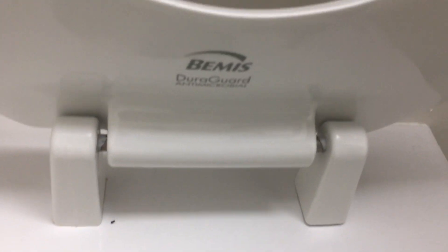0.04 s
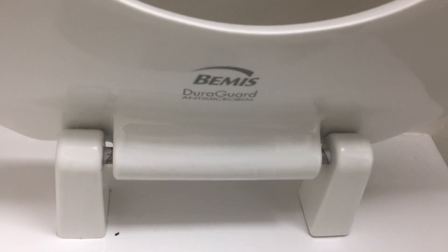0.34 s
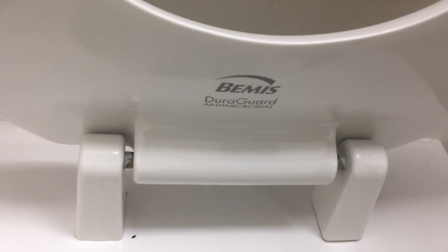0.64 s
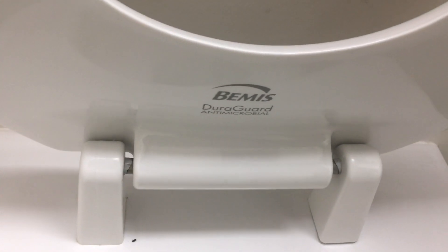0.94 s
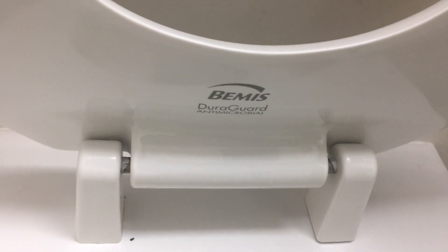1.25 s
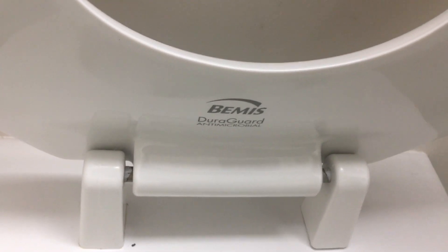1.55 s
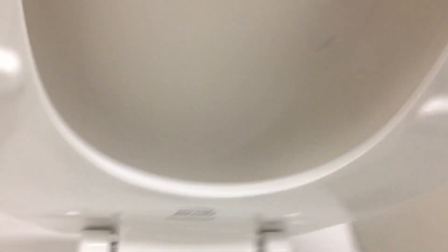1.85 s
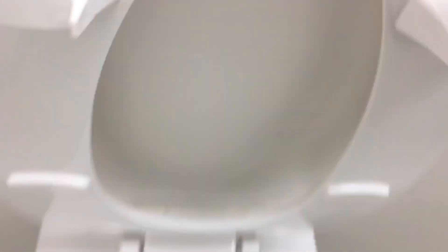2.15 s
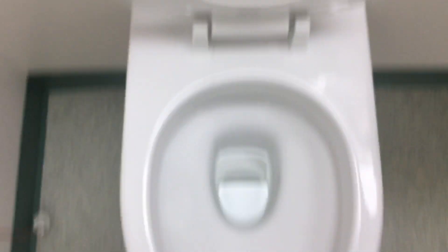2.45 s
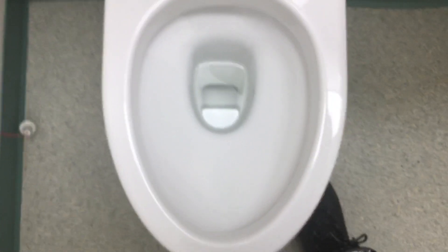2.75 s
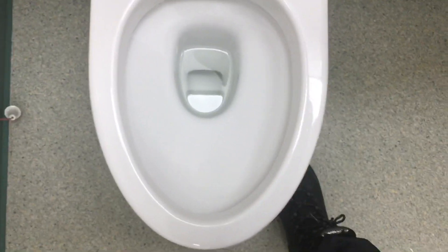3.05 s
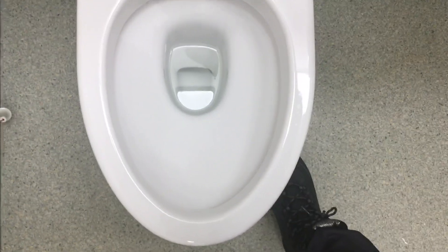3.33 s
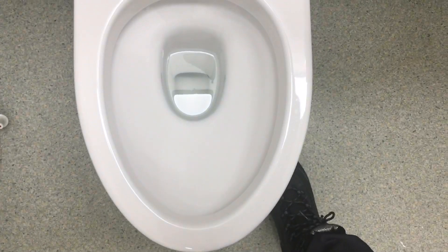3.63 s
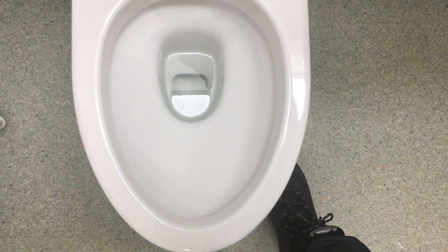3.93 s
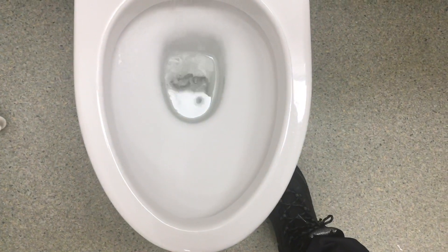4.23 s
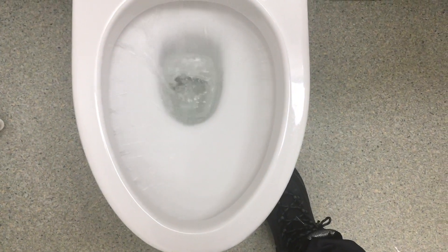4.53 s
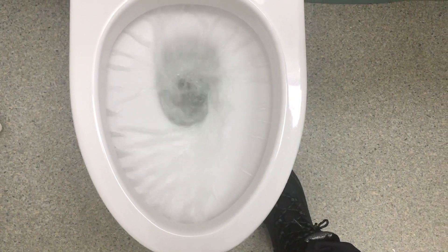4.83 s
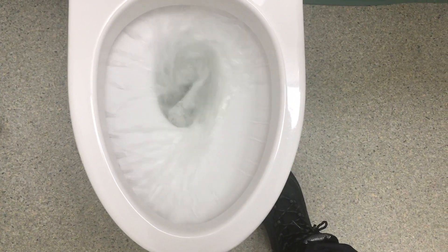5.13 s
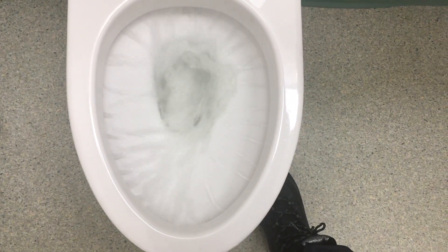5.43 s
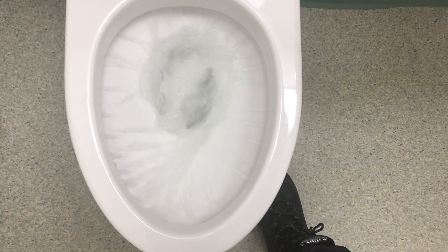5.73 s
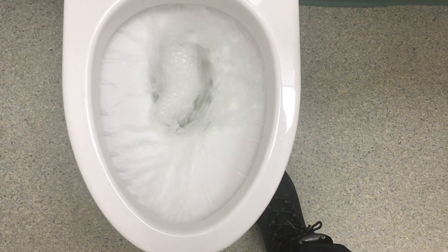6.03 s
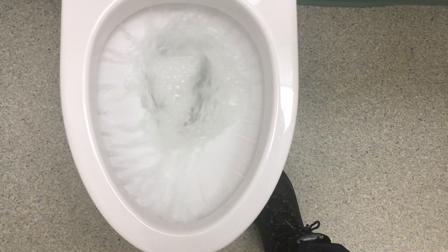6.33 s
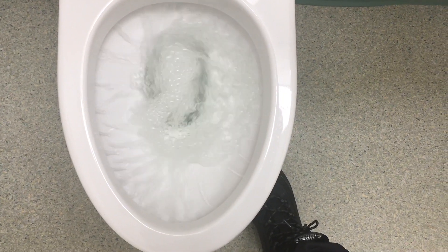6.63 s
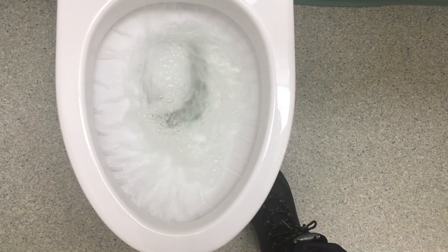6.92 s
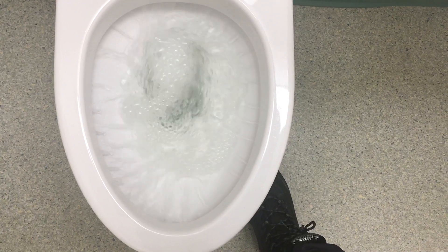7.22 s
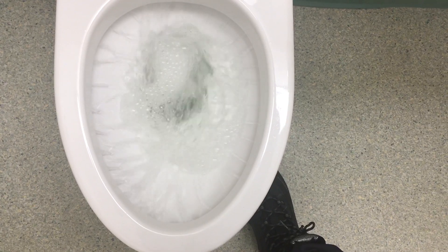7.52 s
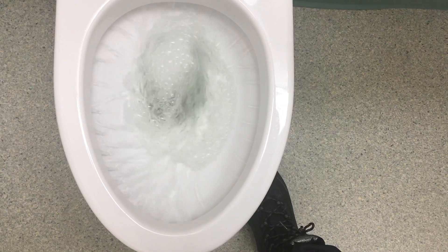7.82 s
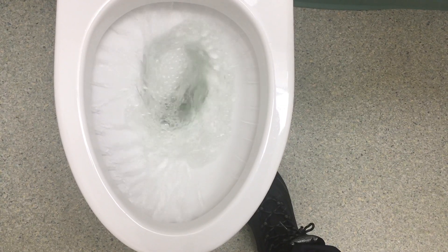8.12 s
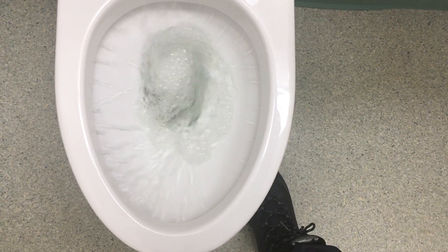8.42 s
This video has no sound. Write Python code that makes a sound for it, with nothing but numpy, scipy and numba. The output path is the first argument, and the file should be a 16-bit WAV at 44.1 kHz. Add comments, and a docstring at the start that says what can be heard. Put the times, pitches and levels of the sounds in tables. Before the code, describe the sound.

A low fan hum and a thin, faint plumbing hiss fill a small washroom, and clothing brushes softly as someone moves. Then a pressure-fed toilet flushes, heard from just above the bowl: a short squeal, deep gulps of air, and a loud, hissing rush of water. The whirlpool froths and glugs with scattered plops and splashes, ringing briefly off hard walls and still running at the end.

```python
"""A pressure-fed toilet flushes in a small, hard-walled washroom; one microphone above the bowl.
At first the ventilation rumbles, a seal seeps and whistles, and clothes rustle as someone straightens up.
Near 3.9 s the valve squeals open and the jet blows air through the trap in booming gurgles.
Rim jets then spray the china while the whirlpool churns, plops and surges down the drain.
From 6.6 s the water stands high: bowl and drain ring differently and the froth dies down."""
import sys
import numpy as np
from scipy import signal
from scipy.fft import rfft, irfft, next_fast_len
from scipy.io import wavfile
from scipy.ndimage import uniform_filter1d
from numba import njit

SR = 44100
rng = np.random.default_rng(int(sys.argv[2]) if len(sys.argv) > 2 else 0)


def transcribe(signal):
    """Save signal, clipped to [-1, 1], as a 16-bit WAV file at the path in sys.argv[1]."""
    frames = np.atleast_2d(signal).T
    limited = np.clip(frames, -1, 1)
    pcm = np.round(limited * 32767).astype(np.int16)
    wavfile.write(sys.argv[1], SR, pcm)


N = 377937
TIME = np.arange(N) / SR
FILL_START_S, FILL_END_S = 6.61, 7  # the water climbs in the bowl

# the flush opens, peaks and slackens as the tank empties: (time [s], rim jets [dB], churning pool [dB])
FLUSH_CURVE = [(3.87, -67, -75), (3.91, -49, -64), (3.98, -52, -46), (4.07, -43, -47.5), (4.1, -48, -51),
               (4.16, -36.5, -37.5), (4.31, -39, -41.5), (4.5, -35.5, -37), (4.52, -35.5, -44),
               (4.68, -30.5, -35), (4.99, -27.5, -30), (5.08, -30, -32), (6.11, -31.5, -33),
               (6.23, -34, -38.5), (6.44, -32.5, -31), (6.45, -30.5, -34.5), (8.27, -37.5, -36),
               (8.52, -37.5, -37.5), (8.57, -41, -41)]
# the bowl's resonances at low and at high water: (frequency [Hz], width [Hz], gain [dB])
BOWL_LOW_WATER = [(705, 56, -2), (880, 160, -16), (1020, 70, 4.5), (1110, 50, 1), (1351, 35, 11)]
BOWL_HIGH_WATER = [(650, 76, -16), (796.5, 17, -1), (1056, 50, -5), (1110, 25, -7), (1302, 26, -3),
                   (1351, 22, 3)]


def rim_spray(flow, splatter, spatter_depth):
    """Just below the microphone, sheets of water hiss over the china and break into drops and mist."""
    # spectrum of the spray: (frequency [Hz], gain [dB])
    spray_spectrum = [(400, 0), (1500, -26), (2800, -3), (3900, 0), (4900, -4), (5700, 1.5), (6500, 1),
                      (7700, -5), (8800, -0.5), (9700, -1), (10400, -5), (11200, -0.5), (13000, 0),
                      (15800, 0.5)]
    sheet = unit(noise() * amp(0.76 * wander(650)))
    drops = swarm(count=20000, low_hz=2842, high_hz=13680, cycles=73, spread_db=3.5, rise=0.27)
    drops = unit(np.diff(drops, prepend=0)) * amp(2 * wander(55))  # small drops radiate treble best
    mist = band(noise(), 8300, 15800) * amp(6.4 * wander(140))
    sway = amp(spatter_depth * (0.5 * bursts(rate=45, decay_s=0.045) + 1.8 * splatter + 1.55 * wander(170)))
    spray = colour(sheet + amp(-3.5) * drops + amp(-13.5) * mist, spray_spectrum)
    return amp(1.8) * flow * sway * spray


def whirlpool(churn, splatter, spatter_depth):
    """Froth crackles on the pool above the burble of larger bubbles."""
    # waves that break into froth: (start [s], length [s], level [dB])
    breakers = [(4.17, 0.034, -36.5), (4.775, .015, -27), (4.815, 0.037, -29), (5.0, 0.59, -36.5),
                (6.35, 0.052, -33)]
    # spectrum of the froth: (frequency [Hz], gain [dB])
    froth_spectrum = [(350, -8), (560, -4), (800, -18), (1200, 0), (1700, 3.5), (2020, 3.5), (2400, 1.5),
                      (2780, 5), (3300, -4.5), (4500, -11), (9000, -39)]
    # narrow rings of the channel under the rim: (frequency [Hz], width [Hz], gain [dB])
    rim_modes = [(2055, 75, -2.5), (2217, 53, -1.5), (2585, 58, 0.5), (2875, 43, -6), (2920, 11, -14)]
    froth_gain = np.hypot(churn * amp(0.3), swells(breakers, attack_s=0.0065, release_s=0.0076))
    froth_gain *= amp(-1.86 * np.maximum(TIME - FILL_START_S, 0))  # dies down as the water stands high
    fizz = swarm(count=16000, low_hz=690, high_hz=4613, cycles=39.5, spread_db=2.5, rise=0.38)
    froth = colour(unit(np.diff(fizz, prepend=0)) + amp(-1.5) * noise(), froth_spectrum)
    froth = unit(froth + amp(-11) * resonate(noise(), rim_modes))
    froth *= amp(spatter_depth * (1.95 * splatter + 0.45 * wander(250)))
    hollow = blend(burble(BOWL_LOW_WATER), burble(BOWL_HIGH_WATER), FILL_START_S, FILL_END_S)
    hollow = sustained(hollow, steadiness=0.14)
    hollow *= amp(3.4 * bursts(rate=430, decay_s=0.063) + 0.74 * splatter)
    return froth_gain * froth + amp(-6) * churn * hollow


def burble(modes):
    """Large bubbles and churning water ring the hollow of the bowl."""
    large = swarm(count=3500, low_hz=614, high_hz=1508, cycles=20, spread_db=2, rise=0.29)
    return band(amp(-24) * large + resonate(large + amp(11) * noise(), modes), 534, 1530)


def trapway(flow):
    """Slugs of water shake the drain and the air in the bend booms; between them the trap mutters on."""
    # slugs of water, the first full of air: (start [s], length [s], rumble [dB], gurgle [dB])
    surges = [(3.921, 0.06, -36, -44), (3.996, 0.17, -36, -27), (4.203, .09, -43, -35.5),
              (4.312, 0.17, -32.5, -27), (4.536, 0.11, -47, -34), (4.661, 0.097, -26.5, -27.5),
              (5.093, 0.24, -31, -32), (5.562, 0.079, -39, -36.5), (5.64, 0.19, -29, -37),
              (6.018, 0.14, -34, -38), (6.45, 0.2, -35, -41), (6.82, .16, -38.5, -53),
              (6.98, 0.32, -32, -51), (7.21, 0.29, -29.5, -40.5), (7.62, 0.19, -39.5, -45),
              (7.85, 0.61, -35.5, -44)]
    rumble_surges = swells([(s, length, db) for s, length, db, _ in surges], 0.014, 0.063)
    gurgle_surges = swells([(s, length, db) for s, length, _, db in surges], 0.014, 0.063)
    rumble_gain = np.hypot(flow * amp(-17), rumble_surges)
    gurgle_gain = np.hypot(flow * amp(-16.5), gurgle_surges)
    return amp(-4) * rumble_gain * drain_rumble() + amp(-1) * gurgle_gain * air_pocket()


def drain_rumble():
    """Very large bubbles ring the drain, whose resonances shift as the water climbs."""
    # the drain's resonances at low and at high water: (frequency [Hz], width [Hz], gain [dB])
    low_water = [(75, 12, -5), (102, 18, 0), (151, 12, 1), (175, 30, -11), (230, 22, -13)]
    high_water = [(76, 12, -13), (102, 16, -7), (152, 12, 0), (180, 26, -8), (210, 11, 3)]
    rings = []
    for modes in (low_water, high_water):
        air = swarm(count=2500, low_hz=55, high_hz=450, cycles=4.66, spread_db=0.5, rise=1)
        rings.append(resonate(air, modes, order=2))
    return sustained(blend(*rings, FILL_START_S, FILL_END_S), steadiness=0.97)


def air_pocket():
    """Air trapped in the bend gurgles, and sings one wavering note while the jet still blows air."""
    # resonances of the pocket: (frequency [Hz], width [Hz], gain [dB])
    pocket_modes = [(215, 40, -11), (250, 44, -6), (274, 26, -1), (292, 24, 0), (342, 26, -4.5),
                    (401, 20, -9), (440, 30, -19), (495, 24, -15)]
    air = swarm(count=1800, low_hz=193, high_hz=548, cycles=4.1, spread_db=2.5, rise=0.17)
    note = amp(-1.5) * np.sqrt(2) * np.sin(phase_of(286 + 24 * wander(70)))
    gurgle = resonate(air, pocket_modes, order=2) + blend(note, 0, start_s=4.72, end_s=4.75)
    return sustained(gurgle, steadiness=.9) * amp(1.3 * wander(55))


def gulps():
    """Big gulps of air leave the jet and ring as single bubbles."""
    # gulps: (time [s], level [dB], pitch [Hz], t60 [s])
    gulp_events = [(3.987, -30.5, 673, 0.26), (3.996, -25, 624, 0.19), (4.016, -17, 588, 0.14),
                   (4.003, -29.5, 897, 0.12), (4.055, -28, 558, 0.2), (4.105, -30, 647, 0.18),
                   (4.044, -20, 268, 0.22), (4.091, -17, 294, 0.1), (4.129, -13.5, 284.5, 0.13),
                   (4.168, -28, 317, 0.071), (4.332, -17, 294, 0.12), (4.366, -20, 318, 0.11),
                   (4.729, -12, 257, 0.075), (4.755, -10, 290, 0.044), (5.735, -22, 360, 0.086),
                   (7.293, -18, 249, .06), (7.882, -25, 415, 0.052)]
    s, db, hz, t60 = np.array(gulp_events, float).T.copy()
    return bubbles(s, amp(db), hz, t60, octaves_per_s=np.full(len(s), .3))


def glugs():
    """Each large pocket of air swallowed by the drain swells into one deep, unsteady note."""
    # glugs: (start [s], length [s], pitch [Hz], peak level [dB])
    glug_events = [(4.03, .1, 165, -29.5), (4.19, .14, 160, -33), (4.31, .12, 100, -31),
                   (4.665, .07, 90, -31), (4.7, .1, 145, -31), (5.095, .16, 100, -25.5),
                   (5.24, .13, 148, -32), (5.665, .12, 100, -28), (5.725, .15, 150, -27.5),
                   (6.04, .09, 102, -31), (6.11, .18, 150, -35), (6.155, .08, 100, -31.5),
                   (6.475, .09, 100, -31.5), (6.57, .07, 103, -32), (7.33, .14, 150, -33)]
    out = np.zeros(N)
    for s, length, hz, db in glug_events:
        u = np.linspace(0, 1, int(length * SR))
        pitch = hz * (1 + .05 * wander(60)[:len(u)])
        add(out, s, amp(db) * np.sin(np.pi * u ** .8) * np.sin(phase_of(pitch)))
    return out


def plops():
    """A cavity closes: its rough note climbs as it shrinks, it splits into bubbles and rings the bowl."""
    # cavities in the pool: (time [s], relative level [dB], first pitch [Hz], last pitch [Hz], length [s])
    cavities = [(4.182, -21, 1390, 1500, 0.0049), (4.37, -28, 616, 636, 0.021),
                (4.664, -24.5, 596, 900, 0.009), (4.726, -19.5, 695, 760, 0.011),
                (4.758, -21, 700, 716, 0.0071), (4.843, -17, 1500, 1900, .0026),
                (5.201, -14, 1480, 1750, 0.0048), (5.572, -24, 1345, 1370, 0.018),
                (5.797, -23, 1336, 1380, 0.019), (5.834, -22, 805, 1170, .012),
                (5.971, -25, 820, 1400, 0.0091), (6.003, -19.5, 774, 1280, 0.015),
                (6.091, -20.5, 940, 1055, 0.019), (6.152, -25, 760, 1310, 0.011),
                (6.181, -23, 700, 1150, 0.017), (6.221, -18.5, 750, 1070, 0.01),
                (6.227, -22, 1110, 1490, 0.0072), (6.358, -21, 1130, 1480, 0.007),
                (6.461, -21, 960, 1060, 0.016), (6.65, -26.5, 894, 1000, 0.019),
                (6.672, -19.5, 860, 1160, 0.011), (6.753, -25.5, 955, 1090, 0.011),
                (6.782, -24, 657, 724, 0.029), (7.028, -24.5, 940, 1110, .014),
                (7.219, -21, 1620, 1690, 0.0097), (7.238, -20, 1330, 1360, 0.013),
                (7.3, -28, 1340, 1400, .008), (7.393, -25.5, 765, 1440, 0.0175),
                (7.478, -22, 1230, 1530, 0.011), (7.548, -29, 630, 704, 0.021),
                (7.714, -23.5, 1340, 1450, 0.021), (7.866, -23, 840, 1440, 0.014),
                (7.988, -28.5, 1094, 1130, 0.019), (8.111, -26.5, 660, 686, 0.022),
                (8.248, -22.5, 930, 1430, 0.012), (8.258, -25, 1384, 1410, 0.021),
                (8.394, -29.5, 685, 724, 0.022)]
    notes, splinters = np.zeros(N), []
    for s, db, first_hz, last_hz, length in cavities:
        u = np.linspace(0, 1, int(length * SR))
        pitch = (first_hz + (last_hz - first_hz) * u) * (1 + .07 * wander(700)[:len(u)])
        add(notes, s, amp(db) * np.sin(np.pi * u ** 0.54) * np.sin(phase_of(pitch)))
        for delay, height, loss in rng.random((5, 3)):  # five splinter bubbles within 40 ms
            splinters.append((s + .04 * delay, amp(db - 4.5 - 6 * loss), last_hz * 2 ** (1.3 * height - .75)))
    notes *= amp(2.4 * wander(450) - 1)
    starts, size, hz = np.transpose(splinters).copy()
    blips = notes + bubbles(starts, size, hz, t60=14 / hz, octaves_per_s=np.full(len(hz), 20.))
    ring = blend(resonate(blips, BOWL_LOW_WATER), resonate(blips, BOWL_HIGH_WATER), FILL_START_S, FILL_END_S)
    wakes = [(s - .012, length + .012, db - 16) for s, db, _, _, length in cavities]
    wake = swarm(count=5000, low_hz=702, high_hz=1704, cycles=10, spread_db=5, rise=0.21)
    wake *= swells(wakes, attack_s=.008, release_s=0.032)
    return amp(-4) * blips + amp(-9) * np.std(blips) * ring + wake


def slaps():
    """Flung drops burst on the china; the smallest are the brightest and briefest."""
    # drops: (time [s], relative level [dB], pitch [Hz])
    drops = [(4.145, -30.5, 4450), (4.701, -21, 6420), (4.8047, -20, 8720), (4.8497, -20, 5600),
             (5.115, -23, 12600), (5.848, -16, 13800), (5.865, -14, 13600), (5.946, -27.5, 11700),
             (6.554, -27, 4690), (6.6926, -24, 6220), (6.9277, -38, 5540), (7.0209, -19, 12400),
             (7.3695, -20.5, 6230), (7.577, -27, 15000), (7.6852, -21.5, 8540), (8.0045, -26.5, 6100),
             (8.041, -21, 6100), (8.208, -25.5, 5630), (8.337, -20, 12200), (8.439, -25.5, 5200)]
    out, t = np.zeros(N), TIME[:SR // 20]
    for s, db, hz in drops:
        burst = rng.standard_normal(len(t))
        ring = signal.lfilter(*signal.iirpeak(min(hz, SR / 3), 4.5, SR), burst)
        u = t * hz / 11  # peaks after 11 cycles
        envelope = amp(db - 6.5 + 0.81 * np.log2(hz / 8000)) * u * np.exp(1 - u)
        add(out, s, envelope * (unit(ring) + amp(-1.5) * burst))
    return out


def slosh():
    """Water heaves in the throat of the bowl, a low wash of big bubbles that ebbs between surges."""
    # rise and ebb of the wash: (time [s], relative level [dB])
    heave = [(4.0, -44), (4.2, -37.5), (4.42, -36.5), (4.6, -49), (4.69, -32), (4.88, -40), (5.32, -35),
             (5.41, -53), (5.53, -65), (5.6, -37), (5.85, -41.5), (5.92, -47), (6.02, -40), (6.22, -45),
             (6.29, -52), (6.43, -50), (6.49, -38.5), (6.82, -37), (6.9, -42.5), (7.53, -41.5), (7.62, -40),
             (8.57, -46)]
    # spectrum of the wash: (frequency [Hz], gain [dB])
    wash_spectrum = [(300, 5), (420, -0.5), (500, -3), (580, -2), (700, 5), (850, -0.5), (1000, -3),
                     (1300, -26), (2500, -50)]
    level, = gains(heave)
    wash = swarm(count=3000, low_hz=398, high_hz=1000, cycles=11, spread_db=1, rise=0.28)
    return amp(-2) * level * colour(wash + amp(-3) * noise(), wash_spectrum)


def valve():
    """Water squeezes through the opening valve in rasping, arching whistles, spitting as it goes."""
    # squeals: (start [s], length [s], first pitch [Hz], middle [Hz], last [Hz], relative level [dB])
    squeals = [(3.877, 0.053, 1400, 2100, 2750, -39.5), (3.878, .035, 1020, 1180, 1220, -47),
               (3.885, 0.035, 3350, 3850, 4350, -47), (3.893, .03, 5600, 6250, 6600, -51),
               (3.908, 0.055, 4900, 5500, 5500, -45.5), (3.923, .025, 3250, 3370, 3150, -37.5),
               (3.934, .03, 1000, 1100, 900, -43), (3.943, 0.035, 2450, 2200, 2200, -40.5),
               (3.974, 0.032, 2300, 2550, 2650, -39.5), (3.988, 0.054, 5200, 5830, 5800, -39),
               (4.035, .06, 1300, 1400, 1300, -37), (4.118, .02, 1600, 1640, 1550, -32)]
    out, turbulence_hz = np.zeros(N), 1100
    for s, length, first_hz, middle_hz, last_hz, db in squeals:
        u = np.linspace(0, 1, int(length * SR))
        arch_hz = np.polyval(np.polyfit([0, .5, 1], [first_hz, middle_hz, last_hz], 2), u)
        jitter, rasp_sin, rasp_cos = (wander(turbulence_hz)[:len(u)] for _ in range(3))
        phase = phase_of(arch_hz + 80 * jitter)
        rasp = rasp_sin * np.sin(phase) + rasp_cos * np.cos(phase)
        tone = np.sqrt(2) * (np.sin(phase) + amp(-9.5) * rasp)
        spit = amp(-10) * rng.standard_normal(SR // 2)[:len(u)]
        add(out, s, amp(db - 6.5) * np.sqrt(np.abs(np.sin(np.pi * u))) * (tone + spit))
    return out


def washroom(x, t60, wet_db):
    """Close hard walls return a short, dense tail, 4 ms behind the direct sound."""
    t = TIME[:SR // 2]
    tail = band(noise(), 302, 11700)[:len(t)] * np.exp(-np.log(1000) * t / t60) * (t > .004)
    return x + amp(wet_db) * signal.fftconvolve(x, tail / np.linalg.norm(tail))[:N]


def person():
    """Cloth slides over cloth, with a few light scuffs as someone steps back."""
    # swishes of clothing: (start [s], length [s], level [dB])
    swishes = [(1.7, 0.14, -51), (2.12, 0.49, -53), (2.33, 0.22, -54)]
    # spectrum of the cloth: (frequency [Hz], gain [dB])
    cloth_spectrum = [(260, 1), (450, -6.5), (802, -7), (889, -8.5), (1330, -8.5), (4880, -10.5),
                      (6370, -10.5), (10400, -14), (13000, -11), (15500, -16.5)]
    # scuffs and ticks: (start [s], length [s], pitch [Hz], width [Hz], level [dB])
    scuffs = [(0.557, 0.019, 1720, 220, -55.5), (2.334, 0.014, 2500, 5000, -49),
              (2.392, 0.037, 1150, 300, -54), (2.405, 0.1, 870, 110, -51.5)]
    motion = swells(swishes, attack_s=0.14, release_s=0.34)
    out = motion * colour(noise() * amp(wander(60)), cloth_spectrum)
    for s, length, hz, width_hz, db in scuffs:
        rub = signal.lfilter(*signal.iirpeak(hz, hz / width_hz, SR), rng.standard_normal(SR // 2))
        swell = np.hanning(int(length * SR))
        add(out, s, amp(db) * swell * unit(rub)[:len(swell)])
    return out


def ventilation():
    """Room tone: duct rumble fills the standing waves, with wavering fan tones and a thin, even hiss."""
    # standing waves, low by the seat and at standing height: (frequency [Hz], width [Hz], gain [dB])
    seat_modes = [(54, 20, -3), (74.9, 3.6, 4.5), (113, 22, -4.5), (133.3, 10.4, -2.5), (143.2, 23, -7.5),
                  (169, 10, -25), (211.8, 15, -10.5)]
    standing_modes = [(57, 26, -6), (74, 14, -3), (109, 43, -6), (151, 3.6, 2.5), (175, 16, -1),
                      (190, 13, -14.5)]
    # fan tones: (frequency [Hz], gain by the seat [dB], gain at standing height [dB])
    fan_tones = [(74.7, -39.5, -42), (111.5, -44.5, -49), (133.5, -46.5, -60), (148.5, -46.5, -45),
                 (179, -57, -46), (221.5, -52, -63), (480, -70, -72), (594, -73, -69.5)]
    # spectra of the duct's rumble and of the hiss: (frequency [Hz], gain [dB])
    duct_spectrum = [(20, -44), (40, -8.5), (75, 0.5), (180, -11), (260, -15.5), (350, -22), (600, -29.5),
                     (1200, -32.5), (3000, -45)]
    hiss_spectrum = [(200, 4.5), (1800, -1), (2600, 4), (4300, 0.5), (4950, -1), (5600, -7), (6600, 3.5),
                     (8000, -2), (9500, -0.5), (10400, -5.5), (11500, -1), (15800, -6.5)]
    rising_s = (1.8, 2.3)  # the microphone rises from the seat to standing height
    seat_boom = amp(-42.5) * resonate(noise(), seat_modes, order=2)
    standing_boom = amp(-48) * resonate(noise(), standing_modes, order=2)
    hum = 0
    for hz, *db in fan_tones:
        phase = phase_of(hz + (.6 + hz / 300) * wander(11))
        hum += amp(np.interp(TIME, rising_s, db) + 2.2 * wander(7.6)) * np.sqrt(2) * np.sin(phase)
    duct = amp(-50.5) * colour(noise(), duct_spectrum)
    hiss = amp(-61) * colour(noise(), hiss_spectrum)
    return blend(seat_boom, standing_boom, *rising_s) + duct + amp(-5.5) * hum + hiss


def seeping_seal():
    """Until the valve opens, water seeps past a seal: a narrow hiss and thin whistles with their octave."""
    # leak whistles in the supply pipe: (start [s], length [s], pitch [Hz], level [dB])
    whistles = [(0, 0.12, 3900, -70), (.15, .2, 3740, -73), (.55, .6, 3730, -73), (.82, .5, 4685, -73),
                (0.85, .35, 3985, -72.5), (1.32, .18, 4170, -69.5), (1.34, .15, 3780, -71),
                (2.82, .11, 3750, -67.5), (3.08, 0.11, 3770, -68.5), (3.26, .26, 3840, -70),
                (3.6, .26, 3810, -70)]
    # swells of the hiss: (start [s], length [s], relative level [dB])
    seep_swells = [(.2, 0.41, -70), (3.1, 0.91, -71)]
    # resonances of the seal: (frequency [Hz], width [Hz], gain [dB])
    seal_modes = [(3720, 140, -8), (4600, 120, -6), (5380, 300, -2), (5650, 240, -0.5), (5930, 700, -3)]
    tone, release_s, valve_opens_s = 0, .05, FLUSH_CURVE[0][0]
    waver_hz = 14 * wander(300) + 14 * wander(12)
    for s, length, hz, db in whistles:
        gain = swells([(s, length, db)], attack_s=0.06, release_s=release_s)
        sag_hz = 45 * np.minimum((2 * (TIME - s) / (length + release_s) - 1) ** 2, 1)  # flat at both ends
        phase = phase_of(hz - sag_hz + waver_hz)
        tone += gain * (np.sin(phase) + amp(-6) * np.sin(2 * phase))
    tone *= amp(3 * wander(35))
    seep = np.hypot(amp(-68.5) * (TIME < valve_opens_s), swells(seep_swells, attack_s=0.22, release_s=0.14))
    return tone + amp(2 + wander(16)) * seep * resonate(noise(), seal_modes, order=2)


@njit
def bubbles(start, size, hz, t60, octaves_per_s):
    """Each bubble is a sine that swells for two cycles, then dies while its pitch climbs."""
    out = np.zeros(N)
    for k in range(len(start)):
        first, phase, f, a = int(start[k] * SR), 0., hz[k], size[k]
        fade = np.exp(-np.log(1000) / (t60[k] * SR))
        climb = 2 ** (octaves_per_s[k] / SR)
        for i in range(max(first, 0), min(first + int(t60[k] * SR), N)):
            phase += f / SR
            out[i] += a * min(phase / 2, 1.) * np.sin(2 * np.pi * phase)
            a, f = a * fade, min(f * climb, .45 * SR)
    return out


def swarm(count, low_hz, high_hz, cycles, spread_db, rise):
    """Bubbles at random moments, many faint and few loud; each climbs rise octaves in its life."""
    when, pitch, life, size = rng.random((count, 4)).T
    hz = low_hz * (high_hz / low_hz) ** pitch
    t60 = cycles * (.5 + life) / hz
    weight = amp(-spread_db * np.log(.01 + size))
    return unit(bubbles(when * N / SR, weight, hz, t60, rise / t60))


def bursts(rate, decay_s):
    """Random splashes, rate a second, that jump up and die away; mean 0, spread 1."""
    hits = np.maximum(rate / SR - rng.random(N), 0)
    x = signal.lfilter([1], [1, -np.exp(-1 / (decay_s * SR))], hits)
    return unit(x - x.mean())


def swells(events, attack_s, release_s):
    """Gain of (start, length, dB) events that rise, hold and die away; overlaps add in power."""
    power = np.zeros(N)
    for s, length, db in events:
        t = TIME[:int((length + 6 * release_s) * SR)]
        shape = np.minimum(t / attack_s, 1) * np.exp(-np.maximum(t - length, 0) / release_s)
        add(power, s, (shape * amp(db)) ** 2)
    return np.sqrt(power)


def gains(table):
    """The dB columns of a curve as gains per sample, fading to silence outside its span."""
    s, *columns = np.transpose(table)
    gate = np.interp(TIME, [s[0] - .02, s[0], s[-1] + .02, s[-1] + .1], [0, 1, 1, 0])
    return [gate * amp(np.interp(TIME, s, db)) for db in columns]


def sustained(x, steadiness):
    """A resonance fed by a steady flow keeps a more even strength than chance would give it."""
    power = uniform_filter1d(uniform_filter1d(x * x, SR // 30), SR // 60)
    return unit(x / (np.abs(power) + 1e-6) ** (steadiness / 2))


def blend(before, after, start_s, end_s):
    """Cross-fade two unrelated sounds at even power."""
    share = np.clip((TIME - start_s) / (end_s - start_s), 0, 1)
    return np.sqrt(1 - share) * before + np.sqrt(share) * after


def resonate(x, modes, order=1):
    """Let x ring a set of (Hz, width, dB) resonances, order times over for steeper flanks; rms 1."""
    def response(f):
        return sum(amp(db) / (1 + 1j * (f * f - hz * hz) / (f * width)) ** order for hz, width, db in modes)
    return unit(filtered(x, response))


def colour(x, points):
    """Shape x with a spectrum of (Hz, dB) points; rms 1."""
    hz, db = np.transpose(points)
    return unit(filtered(x, lambda f: amp(np.interp(np.log(f), np.log(hz), db))))


def filtered(x, response):
    """Pass x through a frequency response given as a function of Hz."""
    size = next_fast_len(N + SR // 2, True)
    hz = np.arange(1, size // 2 + 2) * SR / size
    return irfft(rfft(x, size) * response(hz), size)[:N]


def band(x, low_hz, high_hz):
    """Keep one band; rms 1."""
    return unit(signal.sosfilt(signal.butter(3, [low_hz, high_hz], "band", fs=SR, output="sos"), x))


def wander(rate):
    """Smooth chance that takes a new value rate times a second."""
    return 1.2 * np.interp(TIME * rate, np.arange(N // 20), rng.standard_normal(N // 20))


def noise():
    """White noise."""
    return rng.standard_normal(N)


def phase_of(hz):
    """Running phase of a changing pitch, in radians."""
    return 2 * np.pi * np.cumsum(hz) / SR


def amp(db):
    """Decibels to gain."""
    return 10 ** (np.asarray(db) / 20)


def unit(x):
    """Scale to rms 1."""
    return x / np.sqrt(np.mean(x ** 2))


def add(out, start_s, sound):
    """Mix a short sound in at its time."""
    i = max(int(start_s * SR), 0)
    out[i:i + len(sound)] += sound[:max(N - i, 0)]


def scene():
    """The flush rings in the washroom over the room tone; one microphone feeds both channels."""
    flow, churn = gains(FLUSH_CURVE)
    splatter = bursts(rate=250, decay_s=0.01)  # shakes spray and pool together
    # at full flow the splashes merge into a smooth rush; a thinner flow spatters more
    spatter_depth = np.interp(TIME, (4.3, 4.8, 5.7, 8.0), (.9, .6, .62, 1))
    flush = valve() + trapway(flow) + gulps() + glugs()
    flush += rim_spray(flow, splatter, spatter_depth) + whirlpool(churn, splatter, spatter_depth)
    flush += slosh() + plops() + slaps()
    mono = amp(-1) * washroom(flush, t60=0.56, wet_db=-11) + person() + ventilation() + seeping_seal()
    return np.array([mono, mono])


def record(dry):
    """The microphone's signal is cut steeply above 15.8 kHz."""
    return signal.sosfilt(signal.ellip(10, .2, 70, 15800, fs=SR, output="sos"), dry)


dry = scene()
out = record(dry)
transcribe(out)
```